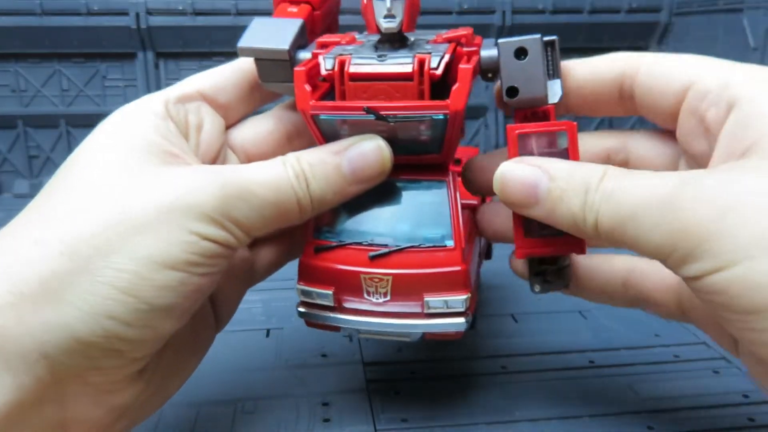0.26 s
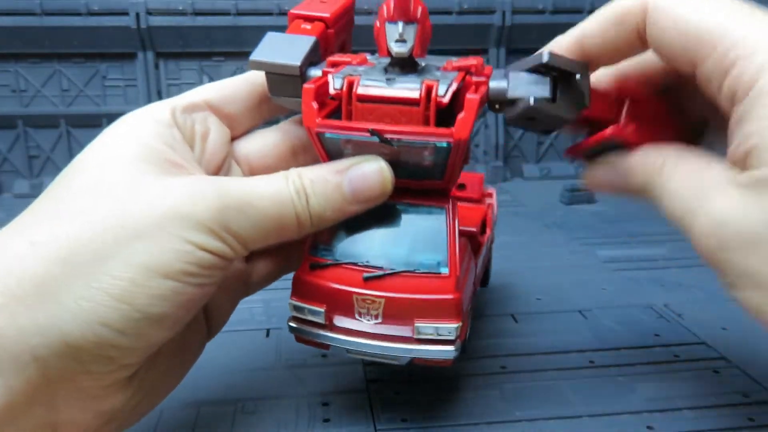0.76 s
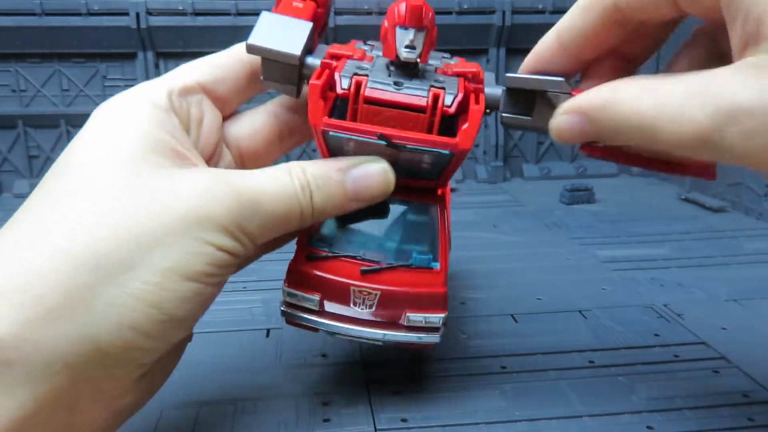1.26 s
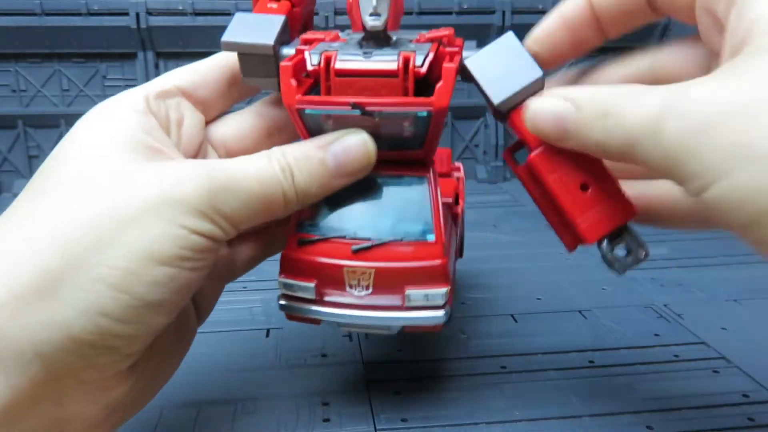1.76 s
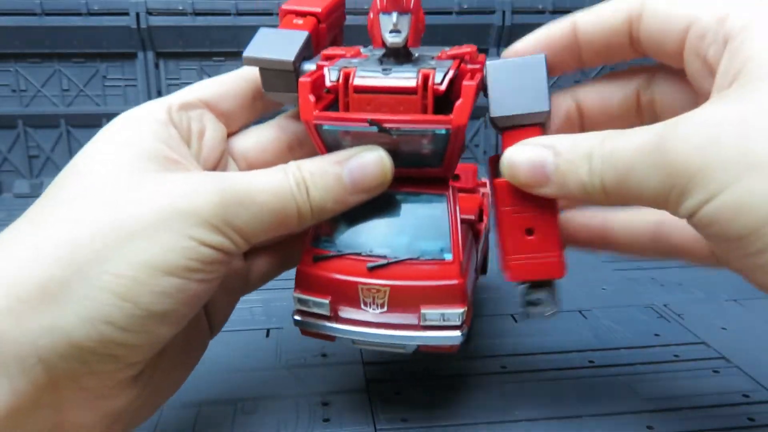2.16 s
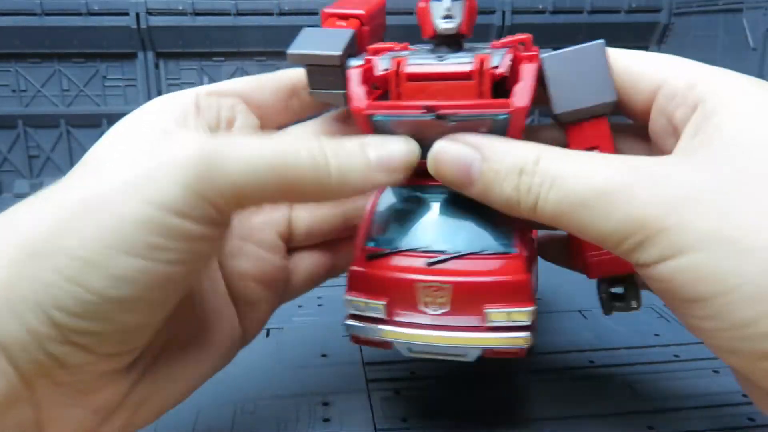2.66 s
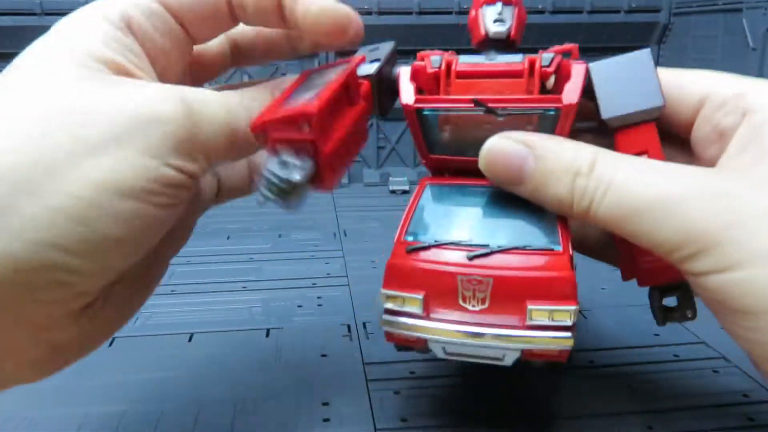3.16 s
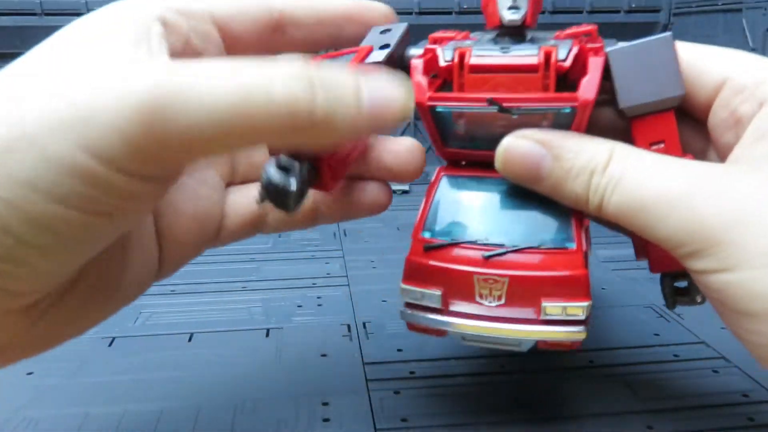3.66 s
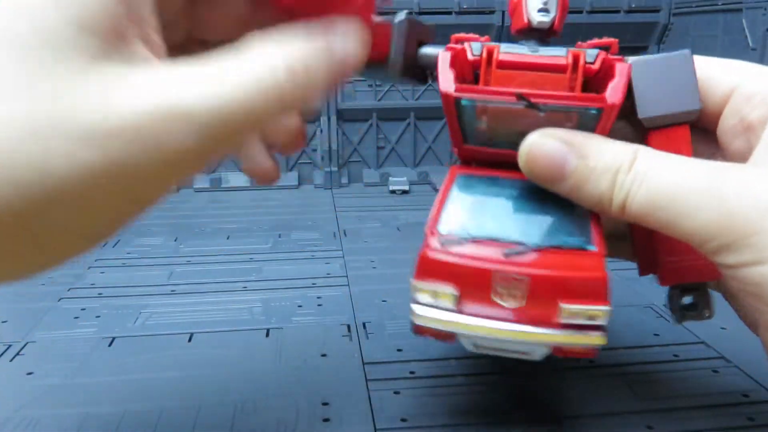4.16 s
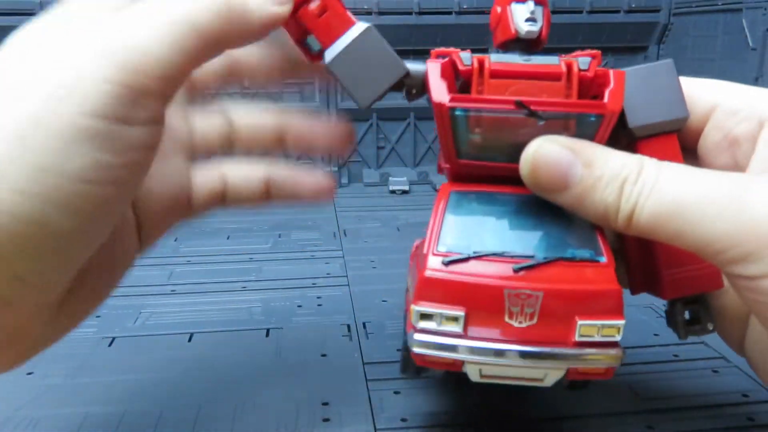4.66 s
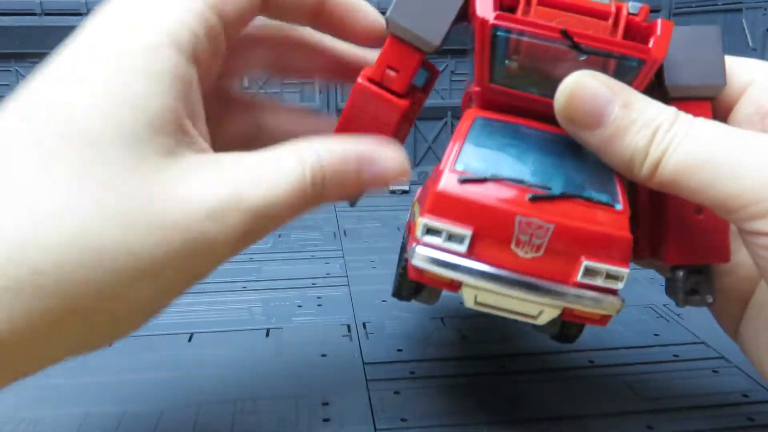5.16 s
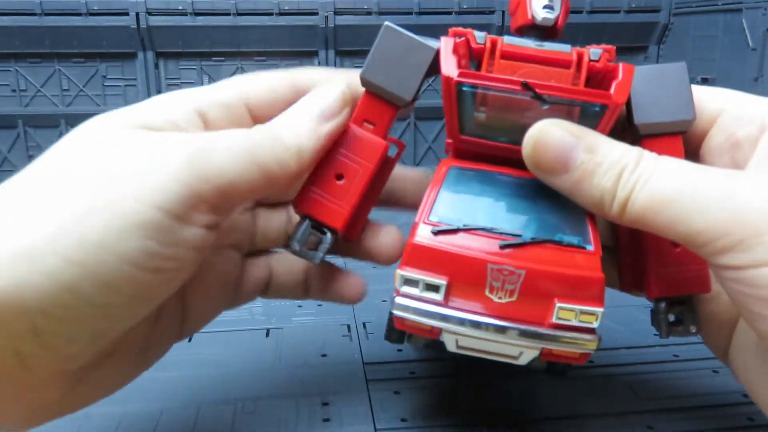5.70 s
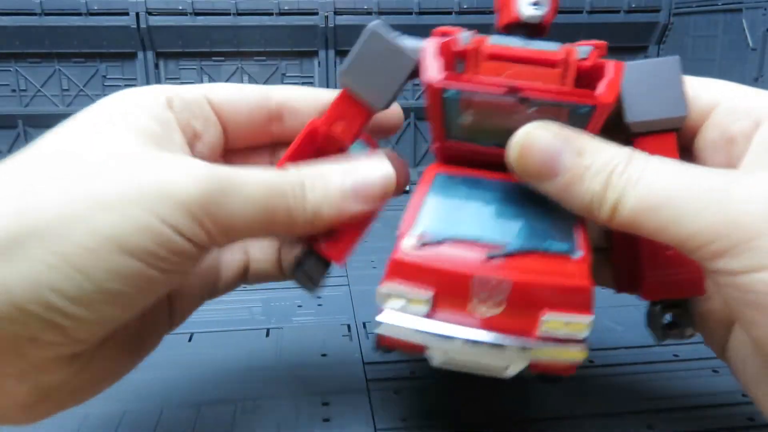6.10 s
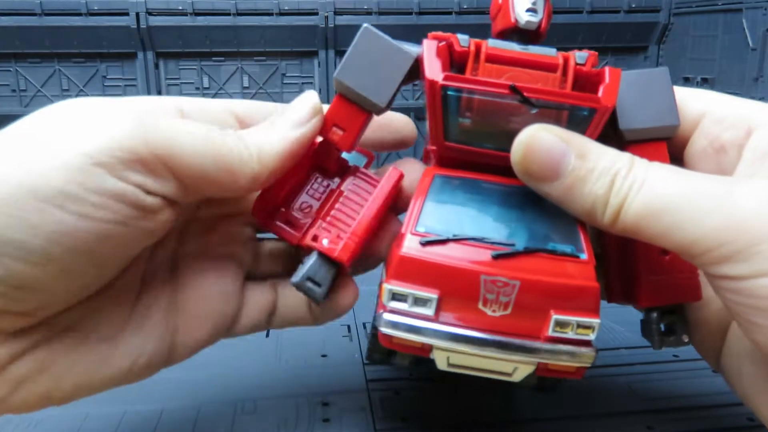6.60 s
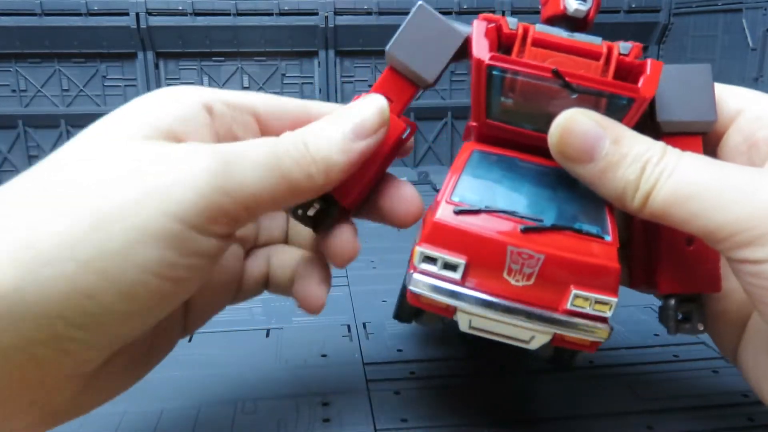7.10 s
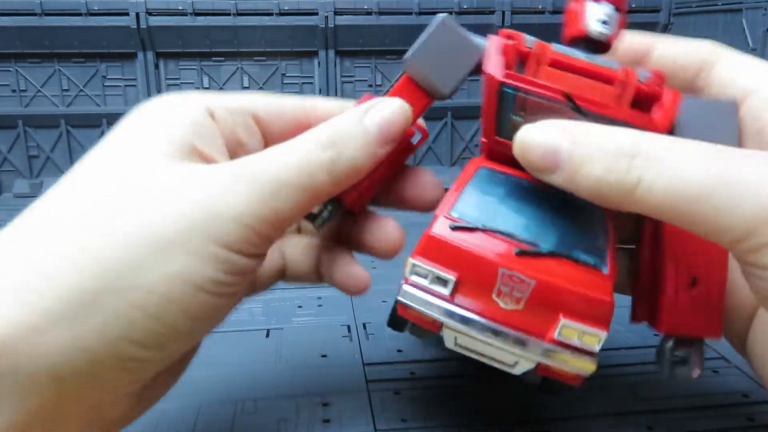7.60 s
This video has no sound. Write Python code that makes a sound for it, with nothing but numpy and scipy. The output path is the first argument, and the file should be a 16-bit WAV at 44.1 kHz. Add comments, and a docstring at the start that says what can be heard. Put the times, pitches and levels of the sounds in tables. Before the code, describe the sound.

Very close stereo sound of a hard plastic toy being handled in a quiet room, with soft hiss and low rumble that swell and sink. Two crisp clicks open, followed by faint ticks. From 0.7 to 0.9 s a tight run of loud ratchet snaps jolts the microphone with low thumps. Single sharp snaps follow at about 1.4, 1.6, 1.95 and 2.15 s, then a sparse lull. At 3.1 s a very loud snap hits together with a hollow, boxy knock, with brief finger scrapes and rattling ticks around it. More clicks cluster at 4.2 to 4.6 s, with dull knocks at 4.5 and 4.8 s. A bright, dense clatter comes at 5.0 to 5.2 s, then light ticks. A hard snap at 6.2 s leads to soft hollow knocks at 6.5 to 6.8 s. The strongest crack lands at 7.3 s, and two knocks with a slight scrape close near 7.7 s.

```python
"""Hard plastic snaps and small ticks, very close, with dull knocks on a hollow table-top set.
Hands turn the ratchet joints of a toy figure near a stereo pair of microphones in a quiet room.
Clicks and scrapes are noise and pushes ringing plastic modes; knocks ring a set of damped panels.
Low lurches, as of overloaded microphones, go with some of the snaps; short reflections surround
the toy, and hiss and rumble swell and sink behind it."""
import sys
import numpy as np
from scipy import signal
from scipy.io import wavfile
from scipy.ndimage import uniform_filter1d

SR = 44100
rng = np.random.default_rng(int(sys.argv[2]) if len(sys.argv) > 2 else 0)


def put_to_file(sound):
    """Save the sound as 16-bit audio at rate SR, in the file named by the first command-line argument."""
    columns = np.atleast_2d(sound).T  # one column per channel
    safe = np.clip(columns, -1, 1)
    whole_steps = np.round(safe * 32767)
    wavfile.write(sys.argv[1], SR, whole_steps.astype(np.int16))


N = 345744

# Joints and loose parts, close up: [t/s, shell peak level/dB, shell pitch f/Hz,
# brightness: rms level re shell peak/dB, rattle t60/s]
JOINT_CLICKS = [(.0516, -12.5, 2330, -21, 0.026), (0.081, -10, 2480, -32, 0.011),
                (0.1957, -31.5, 2650, -29, 0.13), (.3024, -30, 2700, -23.5, 0.082),
                (.579, -32, 2180, -50, 0.022), (0.7042, -9.5, 2200, -23, 0.037),
                (.715, -21.5, 2440, -20.5, 0.013), (.7228, -12.5, 2400, -32.5, 0.023),
                (0.7571, -0.5, 1820, -14.5, .0083), (0.8345, -4.5, 3200, -14.5, .015),
                (.8928, -2, 2510, -19, 0.021), (0.91, -24, 2320, -17.5, 0.035),
                (1.052, -22, 3620, 1, 0.016), (1.228, -51, 2800, -17.5, .04), (1.3375, -26, 2790, 6, 0.027),
                (1.398, -8.5, 2480, -11.5, 0.03), (1.4338, -19, 2340, -19, 0.13),
                (1.487, -34.5, 2300, -14, 0.15), (1.563, -6, 3680, -12.5, 0.016),
                (1.5913, -23.5, 2410, -23.5, 0.036), (1.675, -30, 2400, -28.5, 0.098),
                (1.7774, -39.5, 3260, -16.5, 0.048), (1.8216, -43.5, 2440, -14.5, 0.084),
                (1.955, -5.5, 3350, -10, 0.017), (2.1505, -2.5, 2060, -16.5, 0.013),
                (2.295, -31.5, 2260, -23, 0.14), (2.821, -24.5, 2300, -17.5, 0.037),
                (2.9057, -35, 2840, -11, 0.037), (3.0057, -30, 2380, -17, 0.029),
                (3.027, -35, 2350, -16, .036), (3.05, -20.5, 2500, -17.5, 0.2),
                (3.1153, 8.5, 2100, -33, 0.017), (3.2413, -16, 2750, -17.5, 0.092),
                (3.261, -14, 2710, -25, 0.099), (3.2926, -21.5, 2340, -28, 0.13),
                (3.301, -20.5, 3000, -20, .03), (3.5611, -35, 2380, -20, 0.027),
                (3.6127, -40, 2350, -21, 0.047), (3.7623, -25, 1900, -40, 0.018),
                (3.8194, -25.5, 2550, -18.5, 0.088), (4.0169, -24, 1980, -22, 0.032),
                (4.16, -35.5, 2400, -11.5, .0095), (4.2037, -9, 2370, -25, 0.098),
                (4.2115, -13, 3800, -17.5, 0.026), (4.2273, -15.5, 1930, 0.5, 0.023),
                (4.2776, -24.5, 2660, -25, 0.099), (4.386, -15, 2320, -18.5, 0.089),
                (4.4048, -18, 2270, -18.5, 0.0079), (4.432, -19.5, 2270, -15, 0.034),
                (4.543, -25, 2280, -17.5, 0.12), (4.597, -7, 2120, -10, 0.015),
                (4.9566, -31, 2360, -17, 0.071), (4.9922, -20.5, 2160, -30, 0.057),
                (5.0062, -5, 2340, -9.5, 0.0083), (5.0378, -12.5, 1820, -5.5, 0.025),
                (5.0603, -23, 2340, 0, 0.071), (5.0785, -23.5, 2600, -0.5, 0.034),
                (5.1007, -21, 2350, -5, 0.04), (5.1316, -24.5, 3060, 2.5, 0.022),
                (5.1968, -17.5, 3140, -1.5, 0.017), (5.5615, -32.5, 3340, -10.5, 0.042),
                (5.5769, -28.5, 2760, -15.5, 0.045), (5.732, -25, 2190, -30.5, 0.032),
                (5.8182, -30, 2760, -17.5, 0.057), (5.9942, -22.5, 2840, -30, 0.013),
                (6.0863, -16.5, 3050, -22.5, 0.042), (6.1477, -20.5, 2880, -21.5, .037),
                (6.1723, 3, 3110, -23.5, 0.042), (6.3782, -38, 2160, -14, 0.032),
                (6.6018, -25, 4000, -15, 0.016), (6.7842, -24.5, 2350, -11, 0.032),
                (6.7933, -19, 3220, -20, 0.062), (6.8079, -13, 2860, -18.5, 0.042),
                (7.0241, -19.5, 2030, -26, 0.033), (7.1901, -26.5, 3600, -16, 0.032),
                (7.226, -30, 2200, -25.5, 0.026), (7.2855, -15, 2280, -18.5, 0.022),
                (7.3039, 12.5, 2876, -28, 0.019), (7.4112, -26.5, 3240, -35, 0.0094),
                (7.496, -40, 2314, -29, 0.049), (7.564, -36.5, 1960, -25.5, 0.019),
                (7.7942, -37.5, 2250, -4, 0.013)]
# Plastic modes below the shell: [f/Hz, width f/Hz, level/dB]
LOW_MODES = [(697, 2510, -11), (1220, 2720, -1.5)]
# Modes of the shell: [multiple of the pitch, width f/Hz before spreading, level/dB]
SHELL_MODES = [(1, 576, 1), (1.3, 2370, -1.5), (1.1, 2800, -3)]
# Plastic modes above the shell: [f/Hz, width f/Hz, level/dB]
UPPER_MODES = [(5450, 3010, 12), (6665, 990, 14), (8280, 4280, 10)]
# Highest plastic modes: [f/Hz, width f/Hz, level/dB]
TOP_MODES = [(10880, 4600, -1.5), (12900, 2000, 1.5), (15100, 3000, -5)]
# Fingers and loose parts scraping: [start t/s, level-peak t/s, stop t/s, nominal level/dB],
# not always in time order
FINGER_SCRAPES = [(.03, 0.073, 0.12, -27.5), (3.046, 3.107, 3.112, -23.5), (3.095, 3.186, 3.164, -25.5),
                  (3.74, 3.848, 3.9, -42.5), (4.155, 4.216, 4.34, -30.5), (4.378, 4.416, 4.513, -35),
                  (6.092, 6.167, 6.3, -37), (6.779, 6.781, 7, -43.5), (7.715, 7.755, 7.7, -32)]
# Knocks on the hollow set: [t/s, peak level/dB, hardness: tilt level/dB per octave up to 880 Hz,
# shaking t60/s, extra level of the largest panel/dB]
SET_KNOCKS = [(1.849, -47, -6, 0.27, -38.5), (3.114, 1, 16, 0.37, 10), (3.184, -8.5, 12, 0.44, -30),
              (3.258, -24, -28.5, 0.12, -14.5), (4.492, -12, 8, 0.33, -8), (4.796, -16.5, 5, 0.33, -10),
              (6.267, -36.5, 10, 0.12, -12), (6.499, -16.5, 2.5, 0.35, -12), (6.699, -12.5, -2, 0.32, -19),
              (6.807, -22.5, -2.5, 0.55, -8.5), (7.645, -11, 6, 0.49, -11), (7.736, -14, 5.5, 0.81, -8)]
# Panels of the set, largest first: [nominal f/Hz, relative level/dB, t60/s]
SET_PANELS = [(177.3, 1, 0.39), (239.2, -4, 0.33), (350, 3, 0.03), (444, -2.5, 0.11), (468, -2, 0.011),
              (725, -6.5, 0.12), (778, -5, 0.021), (996, -11, 0.025), (1082, -13.5, 0.075),
              (1665, -5, 0.027), (2100, -6, 0.0019), (2970, -33, 0.031)]
# Lurches as of overloaded microphones: [t/s, nominal level/dB, speed of the first swing f/Hz,
# signed share in left, signed share in right]
MIC_LURCHES = [(0.7566, 4, 221, 1, 0.98), (.7595, 8, 240, .9, -.9), (0.8358, 4.5, 150, .9, .9),
               (0.8943, 11, 140, -.9, -.9), (1.339, -3, 300, 0.39, 0.49), (1.4, -2.5, 300, 0.62, 0.79),
               (1.565, 0.5, 304, 0.22, 0.47), (1.956, -5.5, 300, 0.82, 0.51), (2.152, -6.5, 400, 1, -0.3),
               (4.227, 5, 250, 0.85, 0.8), (4.2295, 3, 330, .9, -.9), (4.597, -6, 298, 0.82, 0.054),
               (5.007, -6, 310, 0.99, 0.41), (5.060, 3.5, 350, 0.25, 0.68), (5.080, -2.5, 352, 1, 0.77),
               (5.199, -1.5, 300, 0.81, 0.76), (7.308, -1.5, 300, 0.8, 0.29)]
# Decay of the room reflections: [f/Hz, t60/s]
ROOM_DECAY = [(200, 0.39), (1000, 0.27), (3000, 0.17), (6000, 0.29), (12000, 0.26)]
# Colour of the room reflections: [f/Hz, relative level/dB]
ROOM_TINT = [(200, -27), (1000, -18), (2700, 2), (4200, -3), (6000, 5), (8800, -5), (11000, 0), (14000, -1),
             (15800, -14)]
# Shape of the background hiss: [f/Hz, relative level/dB per Hz]
HISS_SPECTRUM = [(59, -20.5), (100, -9), (373, -5), (513, -7), (583, -5.5), (1650, -10.5), (2270, -11.5),
                 (3470, -15.5), (7140, -27), (13200, -33.5), (16000, -49)]
# Shape of the background rumble: [f/Hz, relative level/dB per Hz]
RUMBLE_SPECTRUM = [(8.8, -34.5), (15, -7.5), (27, 2), (48, 5), (70, -4), (130, -18.5), (170, -27.5),
                   (290, -120)]
# Likeness of the background at the two microphones: [f/Hz, left-right correlation]
AIR_LIKENESS = [(60, 1.0), (130, 0.94), (290, 0.88), (640, -0.028), (1410, 0.29), (3100, 1), (6820, 0.25),
                (15000, -0.11)]
# Background swelling and sinking over time: [t/s, hiss level/dB, rumble level/dB]
BACKGROUND_LEVELS = [(0, -43, -42), (.4, -47.5, -45), (0.741, -45.5, -47.5), (1.1, -71, -80.5),
                     (1.33, -61, -79), (2.299, -62.5, -75), (2.55, -61, -61), (2.9, -52, -55),
                     (4.15, -50.5, -51.5), (4.3, -60.5, -65), (4.9, -52, -56), (5.302, -60, -64),
                     (5.6, -53.5, -65.5), (6.449, -57, -68), (6.8, -56, -50), (7.27, -48.5, -52),
                     (7.401, -67.5, -66), (7.84, -44, -54)]

# low and top ring of a click: level/dB = offset + slope x brightness
LOW_DB, LOW_SLOPE, TOP_DB, TOP_SLOPE = -5.5, 1, -0.35, 1.193
CRACK, CRACK_S = 9.1, 0.00006  # push of a slipping tooth re the rattle, its width/s
TIGHT_S = 0.013  # rattle t60/s that weakens the push by a factor e
SKEW_S = 0.0001  # largest shift/s of the push at either microphone
SCRAPE_START_DB, SCRAPE_END_DB = -18.5, -12.5  # re the nominal level
BLOW, BLOW_S = 1.31, 0.00043  # push of the finger on the set re the shaking, its moment/s
ROOM_SAME = 0.88  # left-right likeness of the reflections
EDGE_HZ = 16200  # band limit


def tooth(shell_db, pitch_hz, bright_db, t60):
    """One joint click: a brighter one also has more low and top ring beside the shell."""
    low_db = LOW_DB + LOW_SLOPE * bright_db
    top_db = TOP_DB + TOP_SLOPE * bright_db
    return click(shell_db, pitch_hz, low_db, bright_db, top_db, t60)


def click(shell_db, pitch_hz, low_db, upper_db, top_db, t60):
    """A tooth slips: a crack and a dying rattle excite four groups of plastic modes."""
    t = np.arange(SR // 10) / SR
    crack_s = 0.0013
    creep = (1 - np.exp(-t / 0.0004)) ** 3
    onset = creep * (1 + 1.6 * np.exp(-((t - crack_s) / 0.0006) ** 2))

    rattle = onset * gain_of(-60 * t / max(t60, 0.003)) * pair(len(t), same=0.96)
    push_s = crack_s + rng.uniform(-1, 1, size=(2, 1)) * SKEW_S
    # a tight joint lets go in one push
    push = CRACK * np.exp(-((t - push_s) / CRACK_S) ** 2 - t60 / TIGHT_S)
    body_drive = rattle + push
    # small stiff parts rattle longest
    small_drive = onset * gain_of(-60 * t / (t60 + 0.012)) * pair(len(t), same=0.55)

    # a tight grip damps rattle and shell alike
    shell = ring(body_drive, SHELL_MODES, pitch_hz, spread=1 + 0.0017 / max(t60, 0.003))
    out = shell / abs(shell).max()
    side_rings = [(low_db, LOW_MODES, body_drive),
                  (upper_db, UPPER_MODES, small_drive),
                  (top_db, TOP_MODES, small_drive)]
    for level_db, modes, drive in side_rings:
        part = ring(drive, modes)
        out = out + gain_of(level_db) * part / part[:, :SR // 100].std()  # level over the first 10 ms
    return gain_of(shell_db) * out


def ring(x, modes, scale=1, spread=1):
    """Sum of resonances of alternating sign, each passed twice for steep skirts."""
    out = 0
    for k, (hz, width, db) in enumerate(modes):
        b, a = signal.iirpeak(min(hz * scale, SR / 2.2), hz * scale / (width * spread), SR)
        once = signal.lfilter(b, a, x)
        out = out + (-1) ** k * gain_of(db) * signal.lfilter(b, a, once)
    return out


def scrape(start, loudest, stop, nominal_db):
    """Tiny slips of uneven size, each a brief rattle, ring the same plastic modes."""
    points = (start, loudest, stop)
    level_db = nominal_db + np.array([SCRAPE_START_DB, 0, SCRAPE_END_DB])
    t = np.arange(start, stop, 1 / SR)
    sizes = gain_of(4.0 * np.minimum(rng.exponential(1, len(t)), 4))
    slips = sizes * (rng.random(len(t)) < 300 / SR)  # on average 300 per second
    decay = np.exp(-1 / (0.006 * SR))  # each dies with a 6 ms time constant
    drive = signal.lfilter([1], [1, -decay], slips) * pair(len(t), same=0.87)

    sound = ring(drive, SHELL_MODES, 2470)
    for db, modes in (-3.0, LOW_MODES), (-25.5, UPPER_MODES), (-28, TOP_MODES):
        sound = sound + gain_of(db) * ring(drive, modes)
    envelope = gain_of(np.interp(t, points, level_db)) * signal.windows.tukey(len(t), 0.15)
    return start, evened(sound) * envelope


def fidget(level_db):
    """Faint random ticks under the fingers, rising and sinking with the hiss level."""
    out = np.zeros((2, N))
    for place, size, pitch in rng.random((60, 3)):
        at = place * (N - 1)
        tick_db, pitch_hz = level_db[int(at)] + 9 * size, 2100 + 1000 * pitch
        tick = click(tick_db, pitch_hz, low_db=-17.5, upper_db=-16.0, top_db=-18.5, t60=0.025)
        add(out, at / SR, tick)
    return out


def knock(peak_db, hardness_db, t60, largest_db):
    """A soft blow and the lumpy shaking after it ring damped panels, a little retuned every time."""
    t = np.arange(SR // 2) / SR
    lumps = gain_of(2 * evened(uniform_filter1d(rng.standard_normal(len(t)), size=200)))
    envelope = (1 - np.exp(-t / 0.0003)) * lumps * gain_of(-60 * t / max(t60, 0.01))
    blow = BLOW * np.exp(-((t - BLOW_S) / (BLOW_S / 2)) ** 2)
    drive = envelope * pair(len(t), same=0.97) + blow

    out = 0
    for k, (hz, db, ring_s) in enumerate(SET_PANELS):
        level_db = db + hardness_db * np.log2(min(hz, 880) / 350) + largest_db * (k == 0)
        level_db = level_db - 120 * t * max(np.log2(hz / 350), 0)  # the sound dulls as it dies
        level = (-1) ** k * gain_of(level_db) * np.sqrt(ring_s)
        for shift in rng.uniform(-1, 1, size=3):  # three close resonances, within 5 %
            b, a = signal.iirpeak(hz * (1 + shift / 20), hz * ring_s * np.pi / np.log(1000), SR)
            out = out + level * signal.lfilter(b, a, drive)
    # little deep bass, and a soft finger gives little treble
    out = signal.lfilter(*signal.butter(2, [130, 2400], "band", fs=SR), out)
    return gain_of(peak_db) * out / abs(out).max()


def lurch(level_db, hz, left, right):
    """As of an overloaded microphone: a step of pressure settles in ever slower, weaker swings."""
    u = 2 * np.pi * hz * np.arange(SR // 12) / SR
    slowing = np.cos(5.0 * np.log(1 + u / 5.3))
    swing = slowing * (1 + u / 0.52) ** -1.1 * np.exp(-0.04 * u)
    return gain_of(level_db) * np.outer([left, right], swing * (1 - np.exp(-6 * u)))


def room(x, tail_db):
    """Reflections: sparse taps of random sign whose bands die at their own speed."""
    taps = np.zeros((2, SR // 2))
    grid = np.arange(200, SR // 2 - 20, 20)
    at = grid + rng.integers(0, 20, (2, len(grid)))
    np.put_along_axis(taps, at, rng.choice([-1., 1.], at.shape), 1)
    hz, t, bands = signal.stft(taps, SR, nperseg=256)
    decay_db = -60 * t / read(ROOM_DECAY, hz)[:, None]
    bands = bands * gain_of(read(ROOM_TINT, hz)[:, None] + decay_db)
    left, other = signal.istft(bands, SR, nperseg=256)[1]
    tail = np.array([left, ROOM_SAME * left + np.sqrt(1 - ROOM_SAME ** 2) * other])
    tail = gain_of(tail_db) * tail / np.linalg.norm(left)
    return signal.fftconvolve(x, tail, axes=1)[:, :N]


def air(spectrum, level_db, size, patchy_db):
    """Background noise of a given spectrum with drifting patches, at a level that changes over time."""
    hz, frames = np.fft.rfftfreq(size, 1 / SR), 4 * N // size + 5
    a, b, c, d, patches = rng.standard_normal((frames, len(hz), 5)).T
    patches = uniform_filter1d(patches, size=12, axis=0)
    patches = evened(uniform_filter1d(patches, size=8, axis=1))
    same = np.clip(read(AIR_LIKENESS, hz), -1, 1)[:, None]
    left = a + 1j * b
    bands = np.array([left, same * left + np.sqrt(1 - same ** 2) * (c + 1j * d)])
    bands *= gain_of(read(spectrum, hz)[:, None] + patchy_db * patches)
    noise = signal.istft(bands, nperseg=size, noverlap=3 * size // 4)[1][:, :N]
    return evened(noise) * gain_of(level_db)


def pair(count, same):
    """Two channels of white noise with a given likeness."""
    a, b = rng.standard_normal((2, count))
    return np.array([a, same * a + np.sqrt(max(1 - same ** 2, 0)) * b])


def gain_of(db):
    """Amplitude factor of a level in dB."""
    return 10 ** (np.asarray(db) / 20)


def evened(x):
    """Scale to an rms of 1."""
    return x / np.sqrt(np.mean(x ** 2) + 1e-20)


def read(points, hz):
    """Read a table over frequency, interpolated along a log axis."""
    f, value = np.transpose(points)
    return np.interp(np.log(hz + 1), np.log(f + 1), value)


def add(mix, s, sound):
    """Lay a sound into the mix from time s, cut at the end."""
    part = mix[:, round(s * SR):][:, :sound.shape[1]]
    part += sound[:, :part.shape[1]]


def scene():
    """Toy and set close up with their reflections, microphone lurches, and the background."""
    near, jolts = np.zeros((2, 2, N))
    for s, *row in JOINT_CLICKS:
        add(near, s, tooth(*row))
    for row in FINGER_SCRAPES:
        add(near, *scrape(*row))
    for s, *row in SET_KNOCKS:
        add(near, s, knock(*row))
    for s, *row in MIC_LURCHES:
        add(jolts, s, lurch(*row))

    times, *levels = np.transpose(BACKGROUND_LEVELS)
    hiss_db, rumble_db = (np.interp(np.arange(N) / SR, times, db) for db in levels)
    near += fidget(hiss_db + 7)
    background = air(HISS_SPECTRUM, hiss_db, size=1024, patchy_db=2.0)
    background += air(RUMBLE_SPECTRUM, rumble_db, size=4096, patchy_db=0.0)
    return near + room(near, tail_db=-20.5) + jolts + background


def record(dry):
    """The microphones fade above 15 kHz and saturate near full scale; then the band limit."""
    dulled = signal.lfilter(*signal.butter(4, 15000, fs=SR), dry)
    saturated = 1.03 * dulled / (1 + dulled ** 6) ** (1 / 6)
    edge = signal.firwin(511, EDGE_HZ, window=("kaiser", 9), fs=SR)[None]
    return np.clip(signal.oaconvolve(saturated, edge, "same"), -1, 1)


dry = scene()
out = record(dry)
put_to_file(out)
```